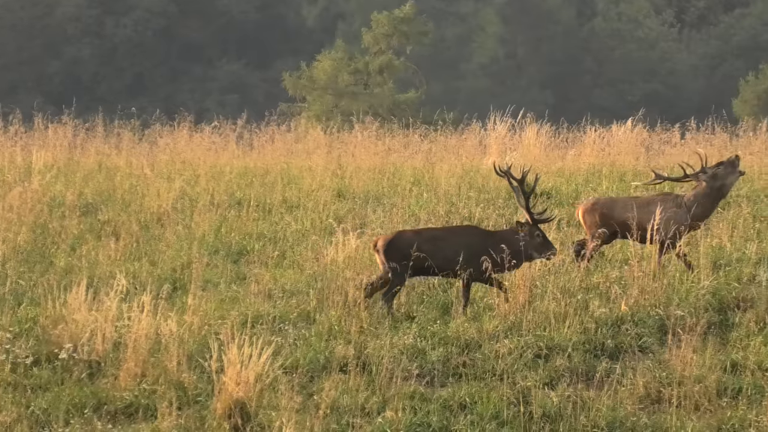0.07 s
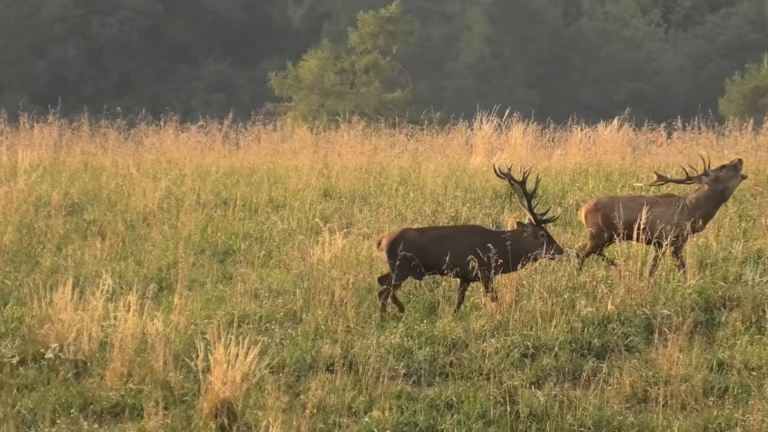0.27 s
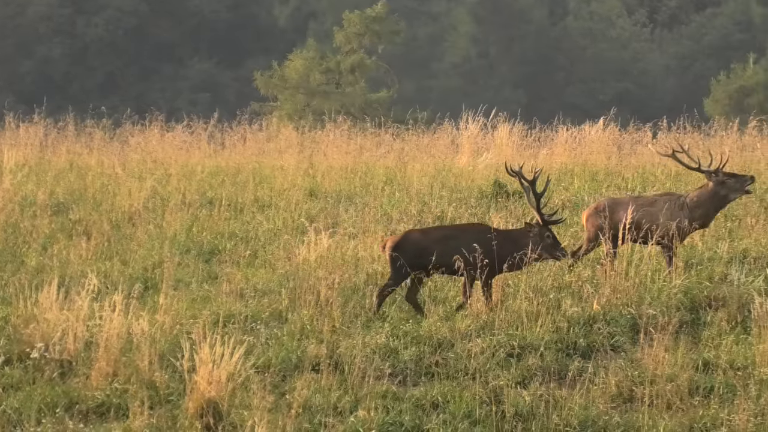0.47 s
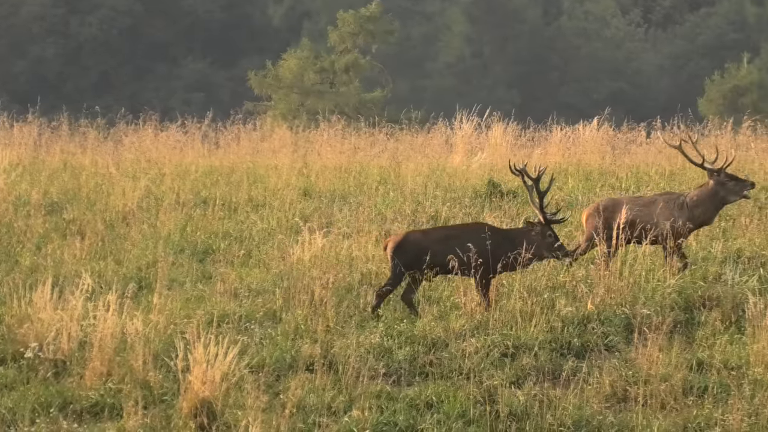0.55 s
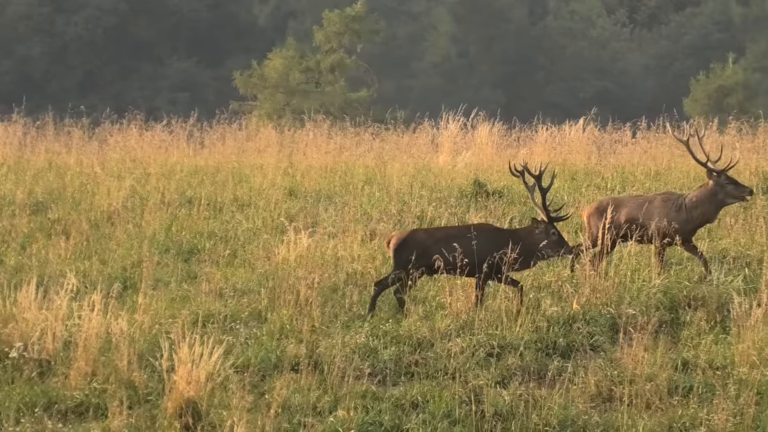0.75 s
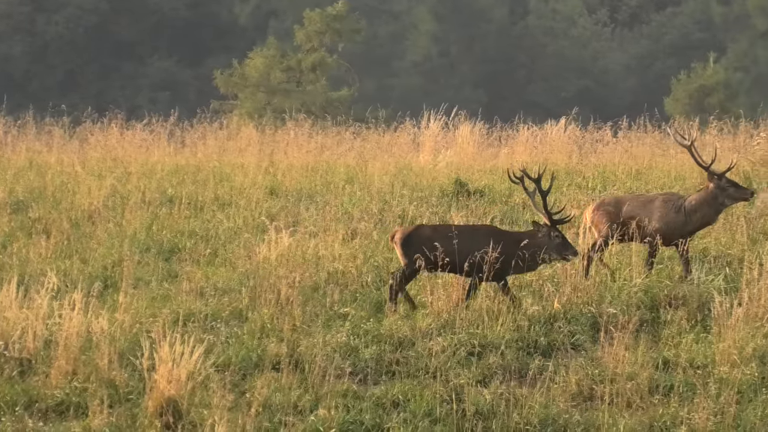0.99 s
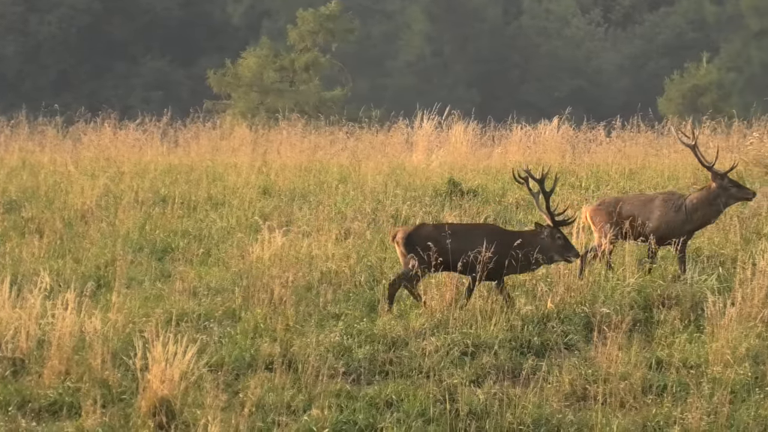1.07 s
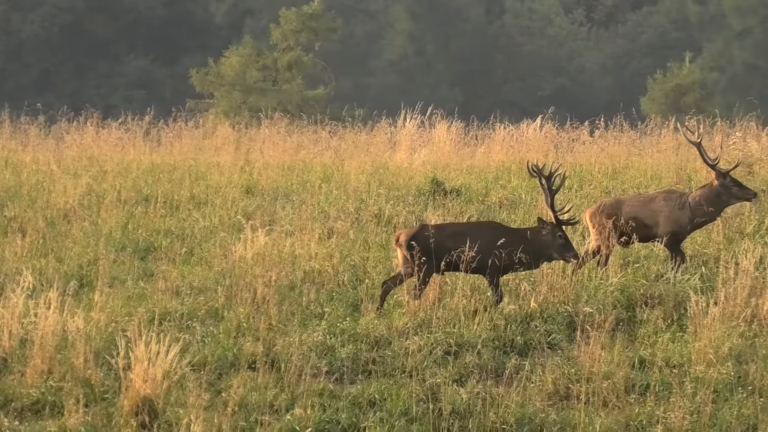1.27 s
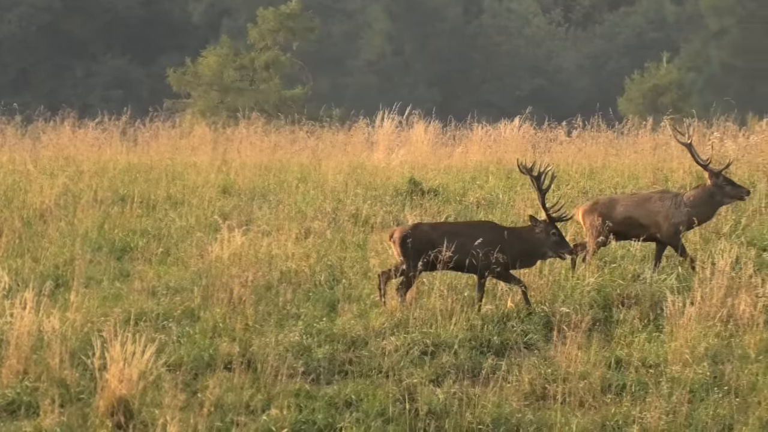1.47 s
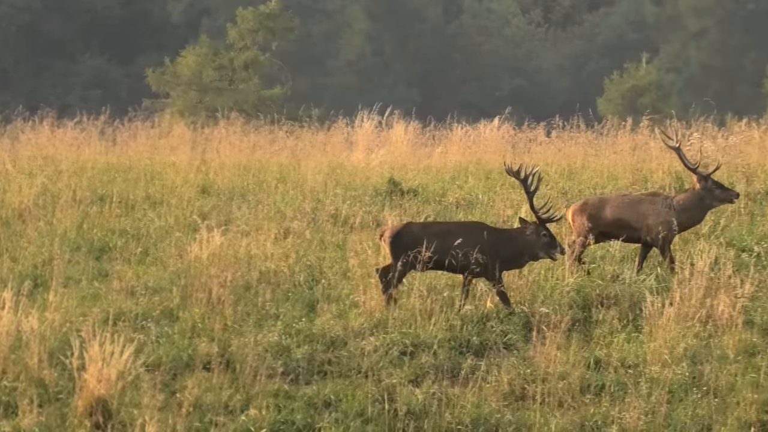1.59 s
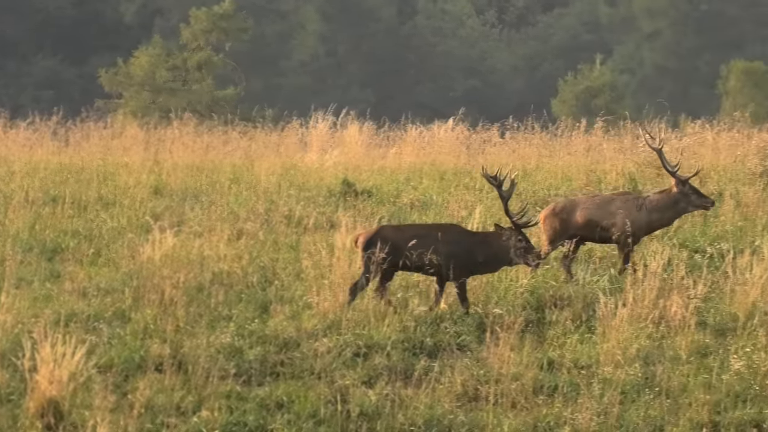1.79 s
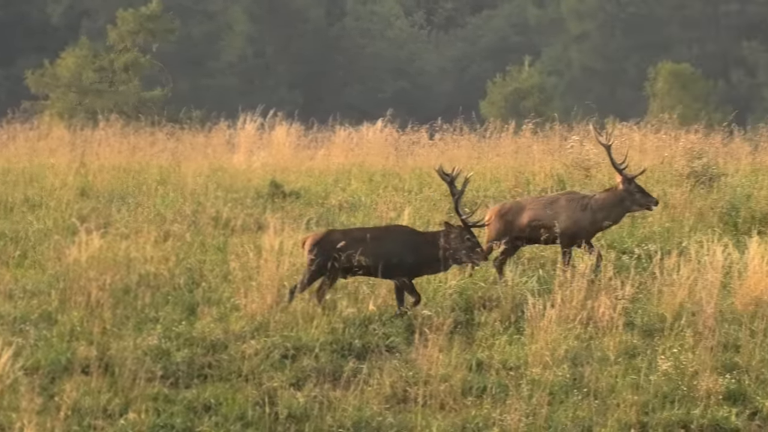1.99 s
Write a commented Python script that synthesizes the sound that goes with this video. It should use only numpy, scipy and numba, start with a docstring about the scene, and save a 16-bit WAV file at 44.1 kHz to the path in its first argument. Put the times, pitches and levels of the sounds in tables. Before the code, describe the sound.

One short bellow from a red deer stag climbs from a throaty rattle to a rough peak, then drops away with a slight echo. Behind it and afterwards, the open field holds only soft air, wind rumble and barely audible insects.

```python
"""A quiet meadow: a red deer stag roars once, from a slow rattle to a hoarse peak and down again.
Vocal fold pulses ring a long throat whose resonances fall as the larynx is pulled down.
The forest edge returns a faint echo. Behind it: distant air, low wind rumble and buffets,
faint insect chirps, one peep of a far bird and microphone hiss."""
import sys
import numpy as np
from scipy import signal
from scipy.fft import rfft, irfft
from scipy.io import wavfile
from scipy.ndimage import uniform_filter1d
from numba import njit

SR = 44100
rng = np.random.default_rng(int(sys.argv[2]) if len(sys.argv) > 2 else 0)


def unload_audio(sound):
    """Save the sound as a 16-bit wav file, at the path given as the first command line argument."""
    columns = np.transpose(np.atleast_2d(sound))
    # keep every value between -1 and 1, then stretch to whole-number steps
    steps = np.round(np.clip(columns, -1, 1) * 32767)
    wavfile.write(sys.argv[1], SR, steps.astype(np.int16))


N = 90404

# spectra of distant air, wind rumble, microphone hiss (frequency [Hz], relative density [dB])
AIR_SPECTRUM = [(50, -35), (90, -1), (150, -7.5), (205, -1), (255, -7), (420, -2), (560, -8.5),
                (800, -10.5), (1100, -13.5), (1600, -15), (2500, -21), (3500, -20), (4500, -26),
                (7000, -29.5), (12000, -30), (15500, -31.5)]
RUMBLE_SPECTRUM = [(10, 4), (25, 0.5), (48, -2.5), (70, -9.5), (110, -24.5), (250, -50)]
HISS_SPECTRUM = [(1500, -15), (3500, -5.5), (6000, 3.5), (15000, 4.5)]
# wind rumble, wind buffets, insect chirps (time [s], level [dB])
RUMBLE_DB = [(0, -52), (.22, -57.5), (.34, -52.5), (.48, -56.5), (.7, -50.5), (1.0, -56), (1.3, -51.5),
             (1.6, -56), (1.77, -59.5), (1.86, -55.5), (2.04, -49)]
BUFFETS_DB = [(.61, -48), (.68, -52), (.985, -45.5), (1.085, -42.5), (1.118, -47), (1.325, -45.5),
              (1.555, -52), (1.83, -50.5)]
CHIRPS_DB = [(.16, -79), (.82, -79), (1.17, -83), (1.33, -81), (1.57, -75), (1.79, -82)]

# vocal fold rate (time [s], pitch [Hz])
PITCH_HZ = [(.05, 88.13), (.18, 84.64), (.265, 87.58), (.32, 111), (.36, 136), (.4, 162), (.44, 179.7),
            (.48, 192.7), (.55, 198.6), (.6, 193.2), (.686, 175.3), (.74, 153.8), (.795, 140.3),
            (.825, 122), (.874, 98.24), (.92, 81.6)]
# hoarseness (time [s], roughness [0-1])
ROUGHNESS = [(.05, 0.13), (.2, 0.16), (.27, 0.31), (.33, 0.29), (.42, 0.51), (.5, 0.56), (.62, 0.91),
             (.7, 0.63), (.75, 0.42), (.8, .18), (.85, 0.62), (.92, 0.62)]
# larynx (time [s], height [1 = at rest, 0 = pulled down])
LARYNX_HEIGHT = [(.07, 1), (.2, 0.67), (.26, 0.39), (.31, 0.19), (.39, 0.065), (.47, 0.011), (.66, -0.047),
                 (.77, 0.049), (.9, 0.064)]
# two lowest resonances, moved by jaw and tongue (time [s], first [Hz], second [Hz])
JAW_HZ = [(.12, 420, 1032), (.22, 386, 925), (.29, 380, 790), (.35, 416, 865), (.39, 465, 825),
          (.425, 495, 844), (.465, 384, 785), (.56, 442.8, 795), (.66, 368, 803), (.745, 454, 834),
          (.8, 428, 858), (.89, 380.3, 722)]
# fixed nose and neck resonances (centre [Hz], width [Hz], relative gain [dB])
NOSE_NECK_MODES = [(335, 60, -11), (590, 55, -17), (700, 45, -14)]
# throat resonances by band
# (at rest [Hz], stretched [Hz], width [Hz], relative gain at rest [dB], relative gain stretched [dB])
MIDDLE_MODES = [(1270, 1115, 25.7, -6, 0.5), (1560, 1345, 20, 0.5, -15), (1925, 1465, 40, -7.5, -0.5),
                (2285, 1640, 65, -13, -3), (2364, 1835, 50, -9.5, -2), (2504, 1955, 21, -9, -2.5)]
TREBLE_MODES = [(3240, 2270, 45, 21, 0.55), (3340, 2540, 19, -23, -2.7)]
HIGH_MODES = [(4470, 2920, 82, 14, 1.5), (4320, 3200, 74, -26, -4), (4570, 3540, 38, -21, -8),
              (6050, 4270, 450, -26, -17), (6500, 5130, 840, 10, -8.5)]
# bands that leave the throat late (centre [Hz], width [Hz])
LATE_BANDS_HZ = [(1350, 240), (1850, 330)]
# roar envelopes by band; the high band sounds while the mouth is wide (time [s], level [dB])
FUNDAMENTAL_DB = [(.2, -71), (.29, -58.5), (.37, -58.5), (.45, -44), (.53, -52.5), (.6, -47), (.68, -43.5),
                  (.725, -50.5), (.78, -58), (.87, -54.5), (.93, -67)]
LOW_DB = [(.03, -69), (.2, -59.5), (.3, -54.5), (.38, -47.5), (.425, -39), (.475, -47.5), (.545, -38.5),
          (.6, -43.5), (.65, -50), (.71, -44), (.74, -43), (.795, -38.5), (.845, -51), (.89, -49),
          (.925, -69)]
MIDDLE_DB = [(.03, -73), (.07, -63), (.14, -60.5), (.19, -53.5), (.21, -50), (.245, -45.5), (.32, -41.5),
             (.385, -41), (.395, -37.5), (.43, -37.5), (.48, -42), (.53, -36), (.575, -35.5), (.592, -42),
             (.605, -35.5), (.648, -45.5), (.668, -36.5), (.705, -48), (.745, -37.5), (.77, -43),
             (.795, -34.5), (.845, -49), (.895, -49), (.925, -58)]
TREBLE_DB = [(.03, -82), (.15, -75), (.215, -63.5), (.27, -63), (.32, -53), (.384, -61), (.396, -47.5),
             (.455, -54), (.5, -48.5), (.57, -53), (.68, -61), (.71, -64), (.79, -58), (.84, -75),
             (.92, -70)]
HIGH_DB = [(.3, -72), (.385, -64), (.398, -46.5), (.415, -58), (.44, -54), (.462, -59), (.48, -52.5),
           (.56, -53), (.592, -60), (.605, -50), (.65, -66), (.67, -54.5), (.7, -66), (.79, -61.5),
           (.84, -73)]

TIME_S = np.arange(N) / SR


def undb(db):
    """Decibels to gain."""
    return 10 ** (np.asarray(db) / 20)


def curve(rows):
    """Linear interpolation of (time [s], value) rows."""
    return np.interp(TIME_S, *np.array(rows).T)


def fade(rows):
    """Gain from (time [s], level [dB]) rows, silent outside them."""
    return undb(curve([(rows[0][0] - .03, -120)] + list(rows) + [(rows[-1][0] + .06, -120)]))


def unit(x):
    """Scale to rms 1."""
    return x / np.sqrt(np.mean(x ** 2))


def steady(x, window_samples=1100):
    """Scale to running rms 1, keeping single pulses."""
    power = uniform_filter1d(uniform_filter1d(x ** 2, window_samples), window_samples)
    return x / np.sqrt(np.abs(power) + 1e-14)


def band(x, lo_hz, hi_hz, order=3):
    """Butterworth band-pass."""
    return signal.sosfilt(signal.butter(order, [lo_hz, hi_hz], "bandpass", fs=SR, output="sos"), x)


def noise(spectrum):
    """Shaped noise, rms 1."""
    hz, db = np.array(spectrum).T
    bin_hz = np.arange(N // 2 + 1) * SR / N
    gain = undb(np.interp(np.log(bin_hz + 1), np.log(hz), db))
    return unit(irfft(rfft(rng.standard_normal(N)) * gain, N))


def drift(rate_hz):
    """Smoothed random steps."""
    hold = int(SR / rate_hz)
    steps = rng.standard_normal(N)[np.arange(N) // hold]
    return 0.8 * uniform_filter1d(uniform_filter1d(steps, hold), hold)


def swell(at_s, half_width_s):
    """Gaussian envelope, peak 1."""
    return np.exp(-((TIME_S - at_s) / half_width_s) ** 2)


@njit
def resonate(x, hz, width_hz):
    """State-variable band-pass with moving centre and width."""
    y, band_state, low_state = np.empty(len(x)), 0., 0.
    for i in range(len(x)):
        g, damping = np.tan(np.pi * hz[i] / SR), width_hz[i] / hz[i]
        v = (band_state + g * (x[i] - low_state) + 1e-18) / (1 + g * (g + damping))
        band_state, low_state = 2 * v - band_state, low_state + 2 * g * v
        y[i] = damping * v
    return y


def distant_air(level_db=-60):
    """Broad, nearly steady noise."""
    return noise(AIR_SPECTRUM) * undb(level_db + .5 * drift(5.15))


def wind(gust_db=.5, buffet_hz=48, buffet_s=.016):
    """Gusty rumble; each buffet pushes the microphone for a cycle or two."""
    rumble = band(noise(RUMBLE_SPECTRUM), 8, 400, order=2)
    rumble *= undb(curve(RUMBLE_DB) + gust_db * drift(14.4))
    phases = rng.uniform(0, 2 * np.pi, len(BUFFETS_DB))
    buffets = sum(undb(db) * swell(at_s, buffet_s) * np.sin(2 * np.pi * buffet_hz * TIME_S + phase)
                  for (at_s, db), phase in zip(BUFFETS_DB, phases))
    return rumble + buffets


def insects(centre_hz=12100, width_hz=1300, chirp_s=.025):
    """Faint chirps of narrow-band noise."""
    shrill = unit(band(rng.standard_normal(N), centre_hz - width_hz / 2, centre_hz + width_hz / 2, order=2))
    return shrill * sum(undb(db) * swell(at_s, chirp_s) for at_s, db in CHIRPS_DB)


def far_bird(at_s=.745, peep_s=.006, centre_hz=4580, fall_hz_per_s=33000, level_db=-62):
    """One short falling peep."""
    age_s = TIME_S - at_s
    tone = np.sin(2 * np.pi * age_s * (centre_hz - fall_hz_per_s * age_s / 2))
    return undb(level_db) * tone * swell(at_s, peep_s)


def microphone_hiss(level_db=-74):
    """Thin hiss, opposite in sign left and right."""
    return np.array([[1], [-1]]) * noise(HISS_SPECTRUM) * undb(level_db)


def forest_echo(x, gain_db=-17, t60_s=.48, delay_s=.0067):
    """Diffuse echo from grass and trees."""
    tail = rng.standard_normal(N) * undb(-60 * TIME_S / t60_s) * (TIME_S > delay_s)
    return undb(gain_db) * signal.fftconvolve(x, tail / np.linalg.norm(tail))[:N]


def vocal_folds(cycles, roughness, jitter_s=.00019, shimmer_db=4, rasp_decay_cycles=.81):
    """One pulse and one puff of rasp a cycle; roughness scatters the pulses and feeds the rasp."""
    rasp = unit(rng.standard_normal(N) * np.exp(-(cycles % 1) / rasp_decay_cycles))
    starts = np.searchsorted(cycles, np.arange(1, int(cycles[-1])))
    timing, size = rng.standard_normal((len(starts), 2)).T * roughness[starts]
    onsets = np.clip(starts + (timing * jitter_s * SR).astype(int), 0, N - 1)
    pulses = np.zeros(N)
    pulses[onsets] = undb(shimmer_db * size)
    return unit(pulses), roughness * rasp


def smear(x):
    """All-pass stages spread each pulse over a few milliseconds."""
    for hz, width_hz in LATE_BANDS_HZ:
        x = x - 2 * resonate(x, hz * np.ones(N), width_hz * np.ones(N))
    return x


def throat(source, modes, rest_damping_hz=170):
    """Resonances slide down and ring longer as the larynx drops."""
    height = curve(LARYNX_HEIGHT)
    damping_hz = rest_damping_hz * height ** 2
    ringing = np.zeros(N)
    for rest_hz, stretched_hz, width_hz, rest_db, stretched_db in modes:
        hz = stretched_hz + (rest_hz - stretched_hz) * height
        db = stretched_db + (rest_db - stretched_db) * height
        ringing += undb(db) * resonate(source, hz, width_hz + damping_hz)
    return ringing


def mouth(source, first_width_hz=31.6, second_width_hz=38.7, first_db=-6):
    """Two moving low resonances plus the weak fixed ones of nose and neck."""
    jaw = np.array(JAW_HZ)
    first_hz, second_hz = curve(jaw[:, [0, 1]]), curve(jaw[:, [0, 2]])
    modes = [(first_hz, first_width_hz, first_db), (second_hz, second_width_hz, 0), *NOSE_NECK_MODES]
    return sum(undb(db) * resonate(source, hz * np.ones(N), width_hz * np.ones(N))
               for hz, width_hz, db in modes)


def chest_boom(cycles, pitch_hz, roughness, chest_hz=195, width_hz=24, max_db=-48.5):
    """The second harmonic booms near the chest resonance, in full once the roar is loud and rough."""
    full_effort_db, full_roughness = -45, .18
    resonance = undb(max_db) / np.hypot(1, 2 * (2 * pitch_hz - chest_hz) / width_hz)
    effort = np.minimum(fade(MIDDLE_DB) / undb(full_effort_db), 1)
    effort *= np.minimum(roughness / full_roughness, 1)
    return np.sqrt(2) * np.sin(4 * np.pi * cycles) * resonance * effort


def stag(waver_share=.02, waver_db=1, waver_hz=70.06, throat_rasp_db=6.5, mouth_rasp_db=1):
    """The folds ring mouth and throat, over a sine fundamental and the chest boom."""
    roughness = curve(ROUGHNESS)
    pitch_hz = curve(PITCH_HZ) * (1 + waver_share * roughness * drift(waver_hz))
    cycles = np.cumsum(pitch_hz) / SR
    pulses, rasp = vocal_folds(cycles, roughness)
    throat_drive = smear(pulses + undb(throat_rasp_db) * rasp)
    mouth_drive = pulses + undb(mouth_rasp_db) * rasp
    voice = steady(band(mouth(mouth_drive), 260, 890)) * fade(LOW_DB)
    voice += steady(band(throat(throat_drive, MIDDLE_MODES), 1061, 2110, order=4)) * fade(MIDDLE_DB)
    voice += steady(band(throat(throat_drive, TREBLE_MODES), 2160, 3150)) * fade(TREBLE_DB)
    voice += steady(band(throat(throat_drive, HIGH_MODES), 2740, 3780, order=2)) * fade(HIGH_DB)
    flutter = undb(waver_db * roughness * drift(waver_hz))
    fundamental = np.sqrt(2) * np.sin(2 * np.pi * cycles) * fade(FUNDAMENTAL_DB) * flutter
    return voice + fundamental + chest_boom(cycles, pitch_hz, roughness)


def scene():
    """Meadow, stag and echo; all centred but the hiss."""
    meadow = distant_air() + wind() + insects() + far_bird() + microphone_hiss()
    roar = stag()
    return meadow + roar + forest_echo(roar)


def record(dry):
    """Steep elliptic low-pass."""
    cutoff_hz = 15750
    return signal.sosfilt(signal.ellip(10, .2, 70, cutoff_hz, fs=SR, output="sos"), dry)


dry = scene()
out = record(dry)
unload_audio(out)
```